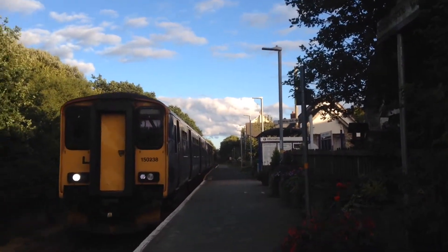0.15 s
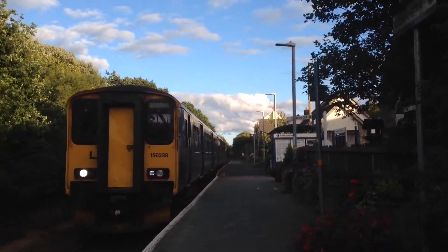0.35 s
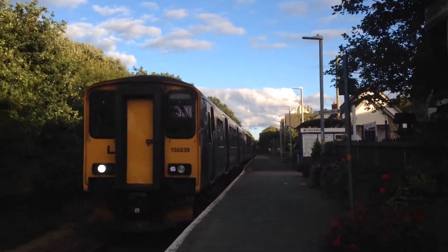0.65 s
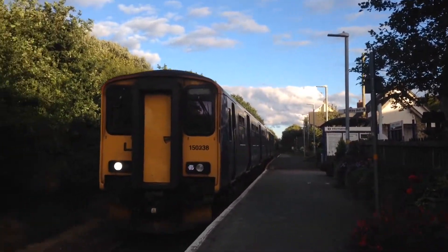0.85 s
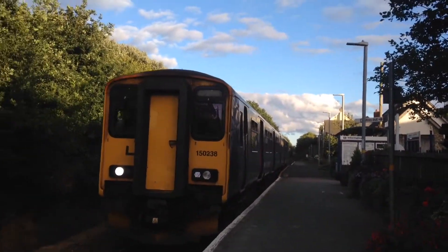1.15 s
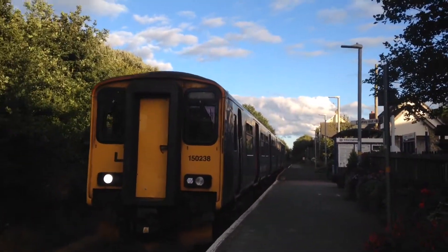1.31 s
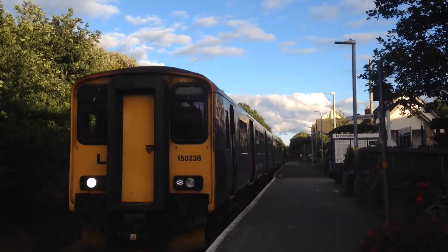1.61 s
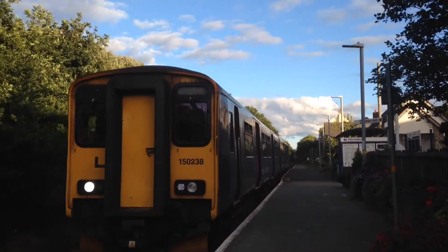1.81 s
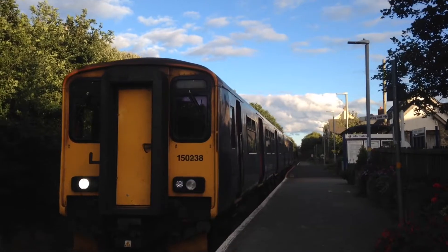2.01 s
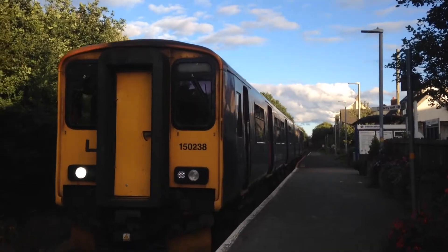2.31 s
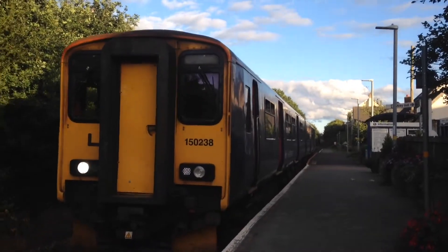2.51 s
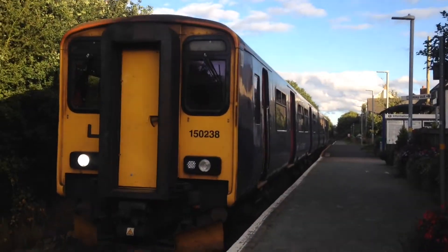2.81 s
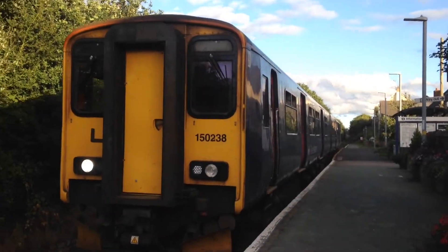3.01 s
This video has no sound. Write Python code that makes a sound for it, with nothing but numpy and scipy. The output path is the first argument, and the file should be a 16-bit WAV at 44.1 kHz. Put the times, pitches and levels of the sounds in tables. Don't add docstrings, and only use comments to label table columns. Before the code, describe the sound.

Train brakes squeal in rough, fluttering metallic bursts over low diesel rumble and airy hiss, easing briefly before a louder, lower groaning screech; heard outdoors by a handheld camera on a small station platform.

```python
import sys
import numpy as np
from scipy import signal
from scipy.fft import rfft, irfft, next_fast_len
from scipy.io import wavfile
from scipy.ndimage import uniform_filter1d, minimum_filter1d, map_coordinates

SR = 44100
rng = np.random.default_rng(int(sys.argv[2]) if len(sys.argv) > 2 else 0)


def wav_out(sig):
    wavfile.write(sys.argv[1], SR, np.round(np.clip(np.atleast_2d(sig).T, -1, 1) * 32767).astype(np.int16))


def field_ratio(decibels):
    return 10 ** (np.asarray(decibels, dtype=float) / 20)


N = 138915

# (start [s], length [s], level [dB], slip rate [Hz])
CHATTER_GRABS = [(0, 0.014, -31, 792.3), (0.052, 0.029, -37.5, 835), (0.135, 0.026, -32, 818),
                 (0.418, 0.059, -33.5, 796), (0.484, 0.054, -29.5, 779), (0.56, 0.053, -33.5, 810),
                 (0.639, 0.033, -33.5, 828), (0.683, 0.093, -33.5, 783.7), (0.827, 0.036, -36, 794.7),
                 (.885, 0.063, -32.5, 792), (0.957, 0.057, -31, 803), (1.071, 0.076, -33, 823.7),
                 (1.22, .075, -36, 787), (1.338, .11, -32, 819), (1.513, 0.069, -34.5, 807),
                 (1.623, 0.054, -34.5, 803), (1.703, 0.06, -31.5, 824), (1.8, 0.092, -31, 815.3),
                 (1.924, 0.07, -32, 826.7), (2.028, 0.075, -31.5, 783), (2.386, 0.055, -32, 840),
                 (2.45, 0.13, -30, 824.4), (2.619, 0.055, -39, 823), (2.706, 0.039, -24.5, 797.8),
                 (2.768, .17, -24, 802.5), (2.957, 0.18, -22.5, 804)]
# (multiple of slip rate [1], level [dB])
CHATTER_OVERTONES = [(1, 1), (2, 4), (3, 3), (4, -2.5), (5, -8.5), (6, -8.5), (7, -19.5), (8, -17),
                     (9, -26.5), (10, -42), (11, -27)]
# (frequency [Hz], density [dB per Hz])
SCRAPE_SPECTRUM = [(500, -27), (1100, -34), (2000, -1), (3000, -3), (5000, -3), (8000, -17.5),
                   (11000, -21.5), (15500, -24.5)]
GRAB_ATTACK_S, GRAB_RELEASE_S, DRAG_DB = 0.02, 0.045, -69
SCRAPE_DB = -12

# (frequency [Hz], density [dB per Hz])
RUMBLE_SPECTRUM = [(12, -45), (20, -16.5), (92, 6), (174, 2.5), (263, -1), (354, -0.5), (403, -10),
                   (600, -15.5), (780, -74), (1320, -120)]
# (frequency [Hz], density [dB per Hz])
AIR_SPECTRUM = [(300, -2.5), (600, -7.5), (1200, 1), (2000, -5), (4000, -13), (8000, -29), (15500, -34)]
# (frequency [Hz], level when far [dB], level when near [dB])
ENGINE_ORDERS = [(95.1, -48, -68), (181, -50.5, -51), (353.3, -64.5, -43.5)]
RUMBLE_DB, AIR_DB = -40.5, -36
LULL_S, LULL_WIDTH_S, LULL_DB = 2.27, 0.089, -2

# (start [s], length [s], level [dB], pitch [Hz])
MOAN_SWELLS = [(0.027, 0.038, -31, 840), (0.236, 0.036, -30.5, 868.5), (0.332, 0.12, -26, 850),
               (0.466, 0.095, -27.5, 820.3), (0.7, 0.056, -28, 806), (0.757, 0.053, -30, 841),
               (0.893, 0.063, -28.5, 785), (1.046, 0.06, -27, 835), (1.109, 0.076, -27.5, 848),
               (1.2, 0.091, -30, 825), (1.308, 0.044, -28, 841), (1.372, 0.046, -28.5, 816.6),
               (1.51, 0.075, -26.5, 837), (1.599, 0.059, -25.5, 823.5), (1.673, 0.034, -30.5, 777),
               (1.831, 0.038, -27, 834), (1.879, 0.071, -28.5, 829), (1.978, 0.1663, -27.5, 826.7),
               (2.199, 0.026, -24.5, 816), (2.394, 0.089, -28.5, 843.6), (2.5, 0.091, -24.5, 811.4),
               (2.673, 0.2, -31, 788.7), (2.894, 0.044, -31, 780), (2.945, 0.053, -28, 801.6),
               (3.017, 0.046, -44, 798), (3.069, 0.075, -40, 789.4)]
# (multiple of slip rate [1], level [dB])
MOAN_OVERTONES = [(1, -5), (2, -20.5), (3, -19.5)]
# (time [s], pitch [Hz], level [dB])
LOW_DRONE = [
    (0.0, 758.8, -44),
    (0.07, 748.3, -53.5),
    (0.5, 712.2, -38.5),
    (0.74, 752.0, -42),
    (1.45, 750.6, -39),
    (1.48, 701.5, -38.5),
    (2.12, 758.8, -43),
    (2.33, 751.8, -51.5),
    (2.85, 731.1, -32),
    (3.15, 735.3, -38.5),
]
MOAN_BED_DB, MOAN_EDGE_S, MOAN_SAG_HZ_PER_S = -33.5, 0.0088, 325

# (time [s], level [dB])
SCREECH_LEVEL = [(0, -51), (.09, -60), (.55, -36.5), (.88, -44), (.93, -31), (.98, -45), (1.38, -41.5),
                 (1.54, -28.5), (1.7, -38.5), (1.84, -26), (2.06, -40.5), (2.14, -31.5), (2.3, -35),
                 (2.4, -31.5), (2.52, -36.5), (2.84, -27.5), (2.9, -34), (3.15, -39)]
# (multiple of slip rate [1], level [dB])
SCREECH_OVERTONES = [(1, -7.5), (2, 12), (3, -12.5), (4, -31), (6, -9), (8, -15), (10, -18.5)]
SCREECH_HZ = 712

# (time [s], level [dB])
WHISTLE_LEVEL = [(0.0, -63), (0.55, -62), (0.82, -55), (0.97, -59.5), (1.41, -60), (1.43, -55.5),
                 (1.55, -59), (2.06, -60.5), (2.1, -71), (2.25, -62), (2.29, -62), (2.3, -103)]
WHISTLE_HZ, WHISTLE_SAG_HZ_PER_S, WHISTLE_FADE_S = 12535, 25, 0.037

# (start [s], length [s], level [dB], pitch [Hz])
FLECKS = [(0.058, 0.02, -35, 2564), (0.133, 0.02, -36.5, 2490), (0.178, 0.068, -37, 1710),
          (.48, 0.051, -40.5, 2200), (0.577, 0.077, -39, 2160), (0.644, 0.022, -30.5, 2496),
          (0.681, 0.021, -38, 2340), (0.746, 0.022, -32.5, 2339), (0.886, .03, -44, 3930),
          (.89, .03, -38, 3152), (.905, 0.024, -33.5, 2390), (1.089, 0.044, -38.5, 2454),
          (1.401, 0.019, -30.5, 1618), (1.485, 0.047, -42, 4150), (1.625, 0.041, -37.5, 2119),
          (1.47, .14, -39, 696), (1.681, .035, -38, 652), (1.695, .03, -58, 8546),
          (1.708, .03, -35.5, 2485), (1.812, 0.018, -31, 2435), (1.849, 0.019, -34, 2722),
          (1.915, 0.032, -41, 4400), (1.952, 0.024, -35.5, 4006), (2.472, 0.047, -37, 3386),
          (2.619, 0.087, -44.5, 3807), (2.601, 0.068, -36.5, 938), (2.7, .07, -47, 5470),
          (2.705, 0.057, -31, 2380), (2.711, 0.053, -34, 1590), (2.714, 0.0948, -57, 8640),
          (2.772, 0.088, -27.5, 1441), (3.03, 0.039, -28, 1604), (2.71, 0.034, -42, 3170),
          (2.728, .03, -44, 4730), (2.779, 0.025, -34, 3813), (2.86, 0.088, -44.5, 5635),
          (2.88, 0.029, -26, 1590), (2.921, 0.079, -47, 5240), (3.025, 0.026, -41, 5485),
          (3.08, .06, -48, 5500), (3.09, 0.033, -46, 4800)]
FLECK_EDGE_S = 0.0052

# (start [s], length [s], level [dB], first pitch [Hz])
GROAN_SWELLS = [
    (.6, .05, -33.5, 1385),
    (1.5, .05, -33.5, 1380),
    (1.94, 0.039, -29, 1346),
    (2.39, 0.12, -28, 1388),
    (2.6, 0.068, -28, 1323),
    (2.75, .07, -29, 1345),
    (2.94, 0.082, -23, 1298),
    (3.04, 0.084, -21.5, 1258),
]
GROAN_SAG_HZ_PER_S, GROAN_EDGE_S = 800, 0.022

# (frequency [Hz], width [Hz], boost [dB])
WHEEL_RESPONSE = [(917, 88, 4.5), (1160, 71, 1.5), (2254, 44, 4), (3894, 90, 6), (5200, 16, 7),
                  (5528, 110, 5.5), (1836, 200, -3), (3120, 230, 0.5), (1115, 136, -6)]
GROUND_NOTCH = (2760, 190, -11.5)
NOTCH_FILLS_S = (1.2, 1.7)
ECHO_T60_S, ECHO_DB = 0.5, -10

TOP_GAPS_HZ, TOP_GAP_DB, TOP_GAP_DB_PER_KHZ, TOP_GAP_SCATTER_DB = 12850, 18.5, 0.6, 3.5
VALLEY_DB, VALLEY_REACH, VALLEY_SCATTER_DB = 26, 6, 3


def unit(x):
    return x / np.sqrt(np.mean(np.abs(x) ** 2) + 1e-20)


def curves(rows):
    s, *cols = np.transpose(rows)
    return [np.interp(np.arange(N) / SR, s, c) for c in cols]


def wobble(rate):
    t = np.arange(0, N + 16, 16)
    knots = rng.standard_normal(N // 100)
    return np.interp(np.arange(N), t, map_coordinates(knots, [t * rate / SR]))


def coloured(points, patchy_db):
    hz, t, z = signal.stft(rng.standard_normal(N + 512), SR, nperseg=1024)
    field = uniform_filter1d(rng.standard_normal(z.shape), size=7, axis=0)
    field = uniform_filter1d(field, size=6, axis=1)
    f, db = np.transpose(points)
    shape_db = np.interp(np.log(hz + 1), np.log(f), db, left=-120, right=-120)
    z = z * field_ratio(shape_db[:, None] + patchy_db * unit(field))
    return unit(signal.istft(z, SR, nperseg=1024)[1][:N])


def swell(s, length, edge_s):
    t = np.arange(N) / SR
    return np.clip(np.minimum(t - s, s + length - t) / edge_s + 1, 0, 1) ** 2


def lull():
    t = np.arange(N) / SR
    return field_ratio(LULL_DB * np.exp(-((t - LULL_S) / LULL_WIDTH_S) ** 2))


def stick_slip(slip_hz, tones, wander, jitter, rough, flutter_hz, swell_db, spread=0, count=1):
    rough, out = np.clip(rough, 0, 1), np.zeros(N)
    for detune in spread * (np.arange(count) - (count - 1) / 2):
        drift = wander * wobble(14) + jitter * wobble(120)
        phase = 2 * np.pi * np.cumsum(slip_hz * (1 + detune + drift)) / SR
        turn_db = swell_db * wobble(8.833)
        for k, db in tones:
            flutter = wobble(flutter_hz) + 1j * wobble(flutter_hz)
            fading = np.sqrt(1 - rough) + np.sqrt(rough / 2) * flutter
            level = field_ratio(db + turn_db + swell_db * wobble(16))
            out += level * np.real(fading * np.exp(1j * round(k) * phase))
    return unit(out)


def chatter():
    t = np.arange(N) / SR
    power = (field_ratio(DRAG_DB) * lull()) ** 2
    for s, length, db, hz in CHATTER_GRABS:
        rise = np.clip((t - s) / GRAB_ATTACK_S + 0.5, 0, 1)
        fall = field_ratio(-20 * np.clip(t - s - length, 0, None) / GRAB_RELEASE_S)
        power += (field_ratio(db) * rise * fall) ** 2
    s, length, db, hz = np.transpose(CHATTER_GRABS)
    slip_hz = np.interp(t, s + length / 2, hz)
    tone = stick_slip(slip_hz, CHATTER_OVERTONES, wander=0.007, jitter=0.004, rough=0.9,
                      flutter_hz=115, swell_db=2.2, spread=0.025, count=2)
    grip = np.sqrt(power) * field_ratio(1.5 * wobble(29.78))
    load = uniform_filter1d(grip, size=1300)
    scrape = field_ratio(SCRAPE_DB) * load * coloured(SCRAPE_SPECTRUM, patchy_db=2.0)
    return grip * tone + scrape


def engine():
    near = np.arange(N) / N
    orders = np.zeros(N)
    for hz, far_db, near_db in ENGINE_ORDERS:
        line = stick_slip(np.full(N, hz), [(1, 0)], wander=0.004, jitter=0.003, rough=0.6,
                          flutter_hz=10, swell_db=1.5)
        orders += field_ratio(far_db + (near_db - far_db) * near) * line
    rumble = field_ratio(RUMBLE_DB + 0.22 * wobble(8.2)) * coloured(RUMBLE_SPECTRUM, patchy_db=1.5)
    air = field_ratio(AIR_DB) * lull() * coloured(AIR_SPECTRUM, patchy_db=0.8)
    return rumble + orders + air


def moan():
    s, length, db, hz = np.transpose(MOAN_SWELLS)
    sag = MOAN_SAG_HZ_PER_S * length / 2
    ends_s = np.ravel([s, s + length], order="F")
    ends_hz = np.ravel([hz + sag, hz - sag], order="F")
    slip_hz = np.interp(np.arange(N) / SR, ends_s, ends_hz)
    power = (field_ratio(MOAN_BED_DB) * lull()) ** 2
    for s, length, db, _ in MOAN_SWELLS:
        power += (field_ratio(db) * swell(s, length, MOAN_EDGE_S)) ** 2
    note = stick_slip(slip_hz, MOAN_OVERTONES, wander=0.006, jitter=0.007, rough=0.42,
                      flutter_hz=110, swell_db=0.5)
    low_hz, low_db = curves(LOW_DRONE)
    low = stick_slip(low_hz, MOAN_OVERTONES, wander=0.0119, jitter=0.0095, rough=0.71,
                     flutter_hz=45.12, swell_db=1.0)
    return field_ratio(-4.0) * np.sqrt(power) * note + field_ratio(low_db - 0.2) * low


def screech():
    db, = curves(SCREECH_LEVEL)
    tone = stick_slip(np.full(N, SCREECH_HZ), SCREECH_OVERTONES, wander=0.006, jitter=0.005, rough=0.5,
                      flutter_hz=100, swell_db=0.7)
    return field_ratio(db + 0.2) * tone


def whistle():
    db, = curves(WHISTLE_LEVEL)
    t = np.arange(N) / SR
    on = np.clip((WHISTLE_LEVEL[-1][0] - t) / WHISTLE_FADE_S, 0, 1)
    hz = WHISTLE_HZ - WHISTLE_SAG_HZ_PER_S * t
    tone = stick_slip(hz, [(1, 0)], wander=0.0006, jitter=0.0007, rough=0.8, flutter_hz=150, swell_db=1.1)
    return on * field_ratio(db + 2.9) * tone


def flecks():
    t = np.arange(N) / SR
    fading = 1 + 0.65 * (wobble(90) + 1j * wobble(90))
    out = np.zeros(N)
    for s, length, db, hz in FLECKS:
        ring = np.real(fading * np.exp(2j * np.pi * hz * t))
        out += field_ratio(db + 0.5) * swell(s, length, FLECK_EDGE_S) * ring
    return out


def groan():
    t = np.arange(N) / SR
    hz, level = np.full(N, float(GROAN_SWELLS[0][3])), np.zeros(N)
    for s, length, db, first_hz in GROAN_SWELLS:
        falling_hz = first_hz - GROAN_SAG_HZ_PER_S * np.clip(t - s, 0, length)
        hz = np.where(t > s - GROAN_EDGE_S, falling_hz, hz)
        level += field_ratio(db) * swell(s, length, GROAN_EDGE_S)
    tone = stick_slip(hz, [(1, 0), (3, -18)], wander=0.007, jitter=0.006, rough=0.6,
                      flutter_hz=55, swell_db=1.2, spread=0.03, count=2)
    return level * tone


def platform(x):
    t = np.arange(SR // 2) / SR
    tail = rng.standard_normal(len(t)) * field_ratio(-60 * t / ECHO_T60_S) * (t > 0.004)
    return signal.fftconvolve(x, tail / np.linalg.norm(tail))[:N]


def wheels(x):
    size = next_fast_len(N + 8192)
    f = np.fft.rfftfreq(size, 1 / SR)

    def response(rows):
        return field_ratio(sum(db * np.exp(-((f - hz) / width) ** 2) for hz, width, db in rows))

    gains = [response(list(WHEEL_RESPONSE) + [GROUND_NOTCH]), response(WHEEL_RESPONSE)]
    far, near = irfft(rfft(x, size) * gains, size)[:, :N]
    return far + (near - far) * np.interp(np.arange(N) / SR, NOTCH_FILLS_S, (0, 0.6))


def with_gaps(x):
    hz, t, z = signal.stft(x, SR, nperseg=2048)
    power = uniform_filter1d(np.abs(z) ** 2, size=4, axis=0)[2::4]
    level_db = 10 * np.log10(power + 1e-20)
    strip_hz = hz[2::4, None]
    strip_of_bin = np.minimum(np.arange(len(hz)) // 4, len(level_db) - 1)

    whistle_db = level_db[(strip_hz[:, 0] > 12300) & (strip_hz[:, 0] < 12700)].max(axis=0)
    pair_db = level_db.reshape(-1, 2, len(t)).mean(axis=1)
    chance = uniform_filter1d(rng.standard_normal(pair_db.shape), size=3, axis=1)
    pair_db = np.repeat(pair_db + TOP_GAP_SCATTER_DB * unit(chance), 2, axis=0)
    threshold_db = whistle_db - TOP_GAP_DB - TOP_GAP_DB_PER_KHZ * (strip_hz - TOP_GAPS_HZ) / 1000
    top = (pair_db < threshold_db) & (strip_hz > TOP_GAPS_HZ)

    below_db = -minimum_filter1d(-level_db, size=VALLEY_REACH, axis=0, origin=VALLEY_REACH // 2 - 1)
    chance = uniform_filter1d(rng.standard_normal(level_db.shape), size=5, axis=1)
    scatter_db = VALLEY_SCATTER_DB * unit(chance) * (1 + strip_hz / 7000)
    depth_db = uniform_filter1d(below_db - level_db, size=3, axis=1) + scatter_db
    valley = (depth_db > VALLEY_DB) & (strip_hz > 1700) & (strip_hz < 15000)

    audible = ~(top | valley)
    return signal.istft(z * audible[strip_of_bin], SR, nperseg=2048)[1][:N]


def scene():
    brakes = chatter() + moan() + screech() + groan() + whistle() + flecks()
    return wheels(brakes + field_ratio(ECHO_DB) * platform(brakes) + engine())[None]


def band_limit(x):
    return signal.sosfilt(signal.butter(12, 15300, fs=SR, output="sos"), x)


def record(dry):
    mix = with_gaps(dry[0])[None]
    return band_limit(mix)


dry = scene()
out = record(dry)
wav_out(out)
```